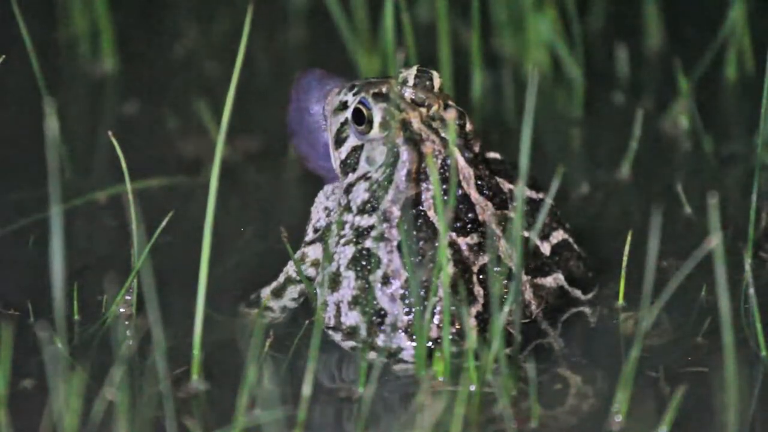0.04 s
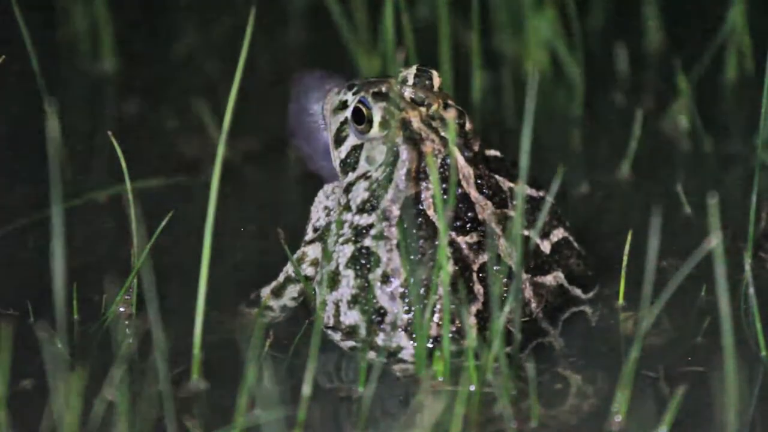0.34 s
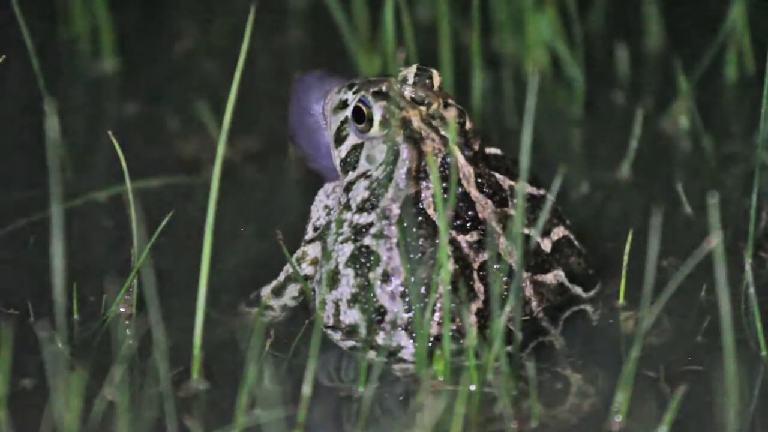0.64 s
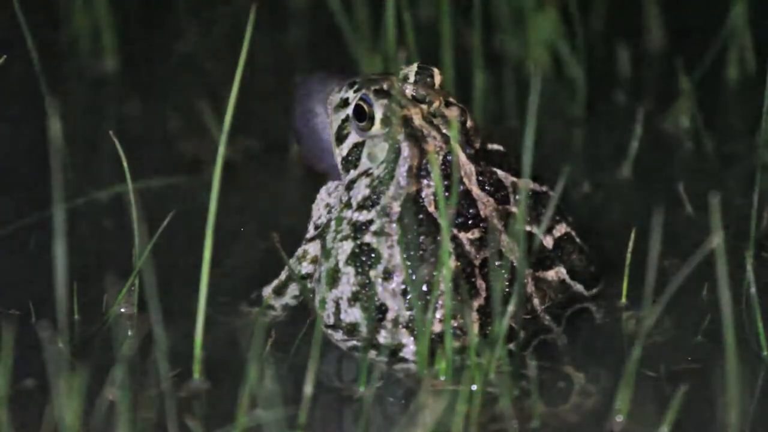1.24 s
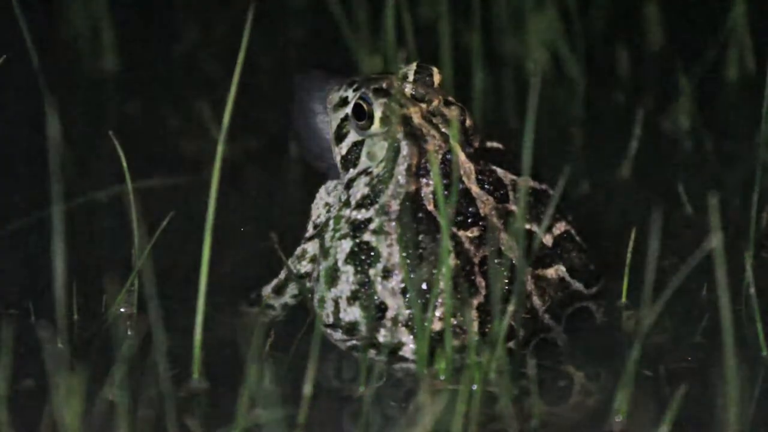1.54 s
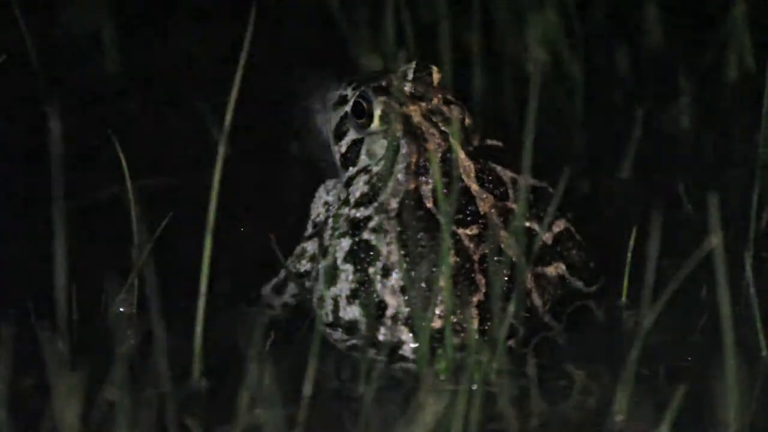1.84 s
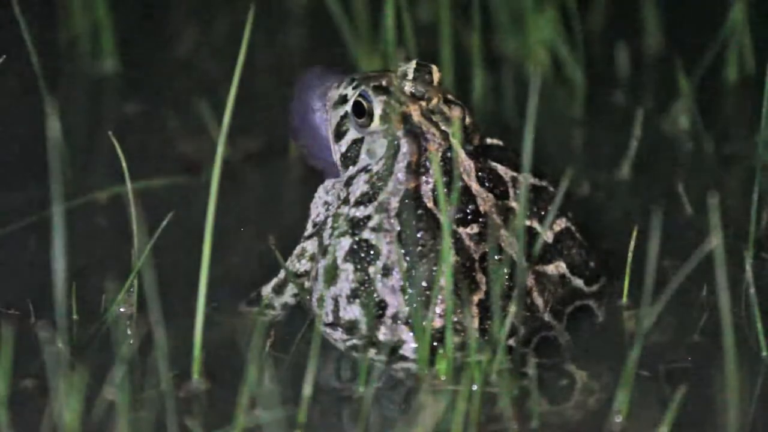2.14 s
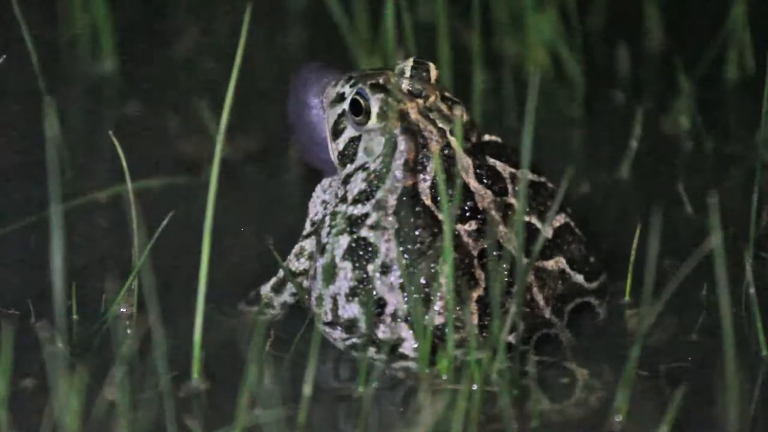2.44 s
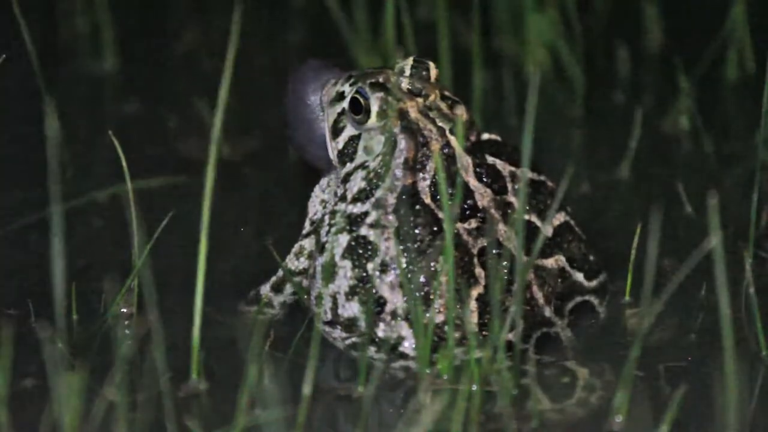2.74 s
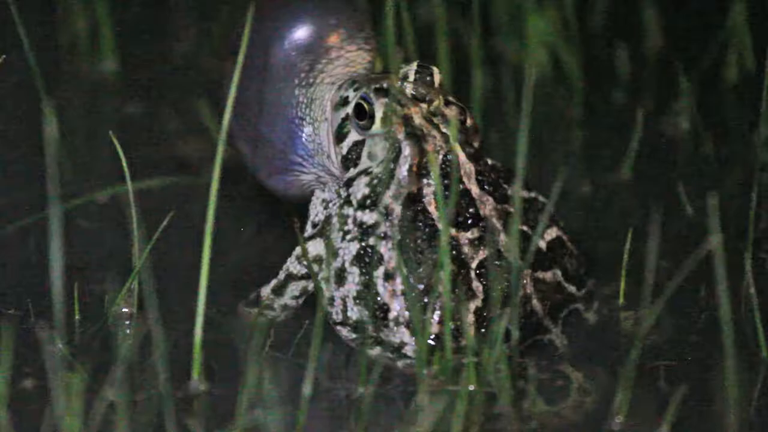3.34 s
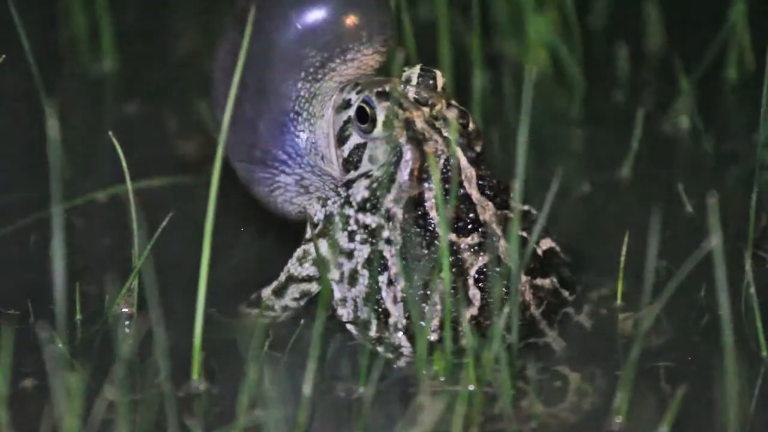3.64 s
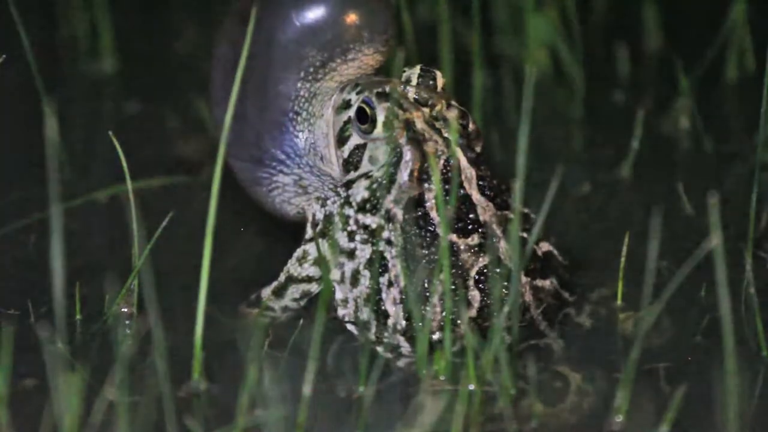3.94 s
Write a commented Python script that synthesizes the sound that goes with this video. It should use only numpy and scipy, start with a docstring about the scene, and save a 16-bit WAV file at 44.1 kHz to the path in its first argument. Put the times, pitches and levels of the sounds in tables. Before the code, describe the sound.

A toad trills rapidly and steadily over a distant chorus, another joining near the end.

```python
"""A toad trills, twelve notes a second, over a chorus in a flooded meadow at night. In each note its vocal
cords give a few short pulses and a longer last one that falls in pitch as the pressure fades.
A toad close by gives creaky chirps and, after three seconds, joins in with full, squeaky notes.
Soft bumps, ticks in the grass and one blip from the water sound over the low rumble of night air,
a faint far-off tone and a thin electrical whine."""
import sys
import numpy as np
from scipy import signal
from scipy.fft import rfft, irfft
from scipy.io import wavfile
from scipy.ndimage import uniform_filter1d, minimum_filter1d

SR = 44100
rng = np.random.default_rng(int(sys.argv[2]) if len(sys.argv) > 2 else 0)


def transcribe(signal):
    """Save signal, clipped to [-1, 1], as a 16-bit WAV file at the path in sys.argv[1]."""
    frames = np.atleast_2d(signal).T
    limited = np.clip(frames, -1, 1)
    pcm = np.round(limited * 32767).astype(np.int16)
    wavfile.write(sys.argv[1], SR, pcm)


N = 176400

# The leader's notes. Each row: start in seconds, relative level in dB, first and last pulse offsets in dB.
LEADER_TRILL = [(0.0058, -5.5, 1.7, 1), (0.088, -6, 0.5, -1), (0.1697, -6, 0.5, 0), (0.2513, -6, 2.6, 0),
                (0.3338, -6, 2, -0.5), (0.4154, -5.5, -0.8, 0), (0.4975, -4.5, -0.5, -2.5),
                (0.5809, -5, -4, -2.5), (0.6632, -5.5, -2, -1), (0.7502, -5.5, -1.4, -3),
                (0.8387, -5, -0.5, -2), (0.9189, -6.5, -1.5, -2), (1.0008, -5.5, -0.9, -3),
                (1.0837, -6, -2.5, -2), (1.1636, -6, -1.0, -1.5), (1.2445, -6, -3.8, -2),
                (1.3261, -6, 0, -1.5), (1.4076, -5, -0.5, -3.5), (1.4896, -5, -1, -1.5),
                (1.5758, -4.5, -0.2, -2.5), (1.6593, -5.5, -6, -1), (1.7441, -6.5, 0.5, -2),
                (1.8253, -6.5, 0.2, -3), (1.906, -7, 2, -1), (1.9902, -5.5, -4.5, 0),
                (2.0747, -5, -0.5, -1), (2.1568, -5.5, 0.1, -2), (2.237, -5, -0.5, -4),
                (2.3186, -5.5, -2.5, -3), (2.4001, -5.5, 0.5, -6), (2.4826, -5.5, -1, -0.5),
                (2.5667, -6, -0.5, -1.5), (2.6469, -6.5, -0.9, -1), (2.7292, -6, -0.5, -2.5),
                (2.8104, -6, 1, -2), (2.892, -6, 0.8, -4.5), (2.9755, -6, 0.5, -1.5),
                (3.0575, -6.5, -0.5, -1), (3.1419, -6.5, 0, -1), (3.2253, -5.5, -2, -2.5),
                (3.3071, -6, 0.5, -1.5), (3.3879, -11, 7, -1), (3.4456, -5.5, -0.6, -3),
                (3.5262, -5, 0.5, -2.5), (3.6092, -5, 0.5, -3), (3.6901, -6, 3, -1.5),
                (3.7721, -6.5, 2, -1), (3.8537, -6.5, -0.5, -4), (3.9356, -6.5, -0.5, -2.5)]
# Overtone envelope of a trill. Each row: frequency in Hz, level in dB against the fundamental.
TRILL_OVERTONES = [(3400, -11), (4200, -38), (4800, -30), (5500, -44), (6300, -64.5), (6900, -47),
                   (7500, -55), (9500, -54.5), (12000, -49), (15000, -62.5)]
# Swell of the distant chorus. Each row: time in seconds, gain in dB.
CHORUS_GAIN = [(0, 0), (.55, -0.5), (.73, -5.5), (.82, 0.5), (1, 3.5), (1.4, 0), (1.6, -1), (1.9, 1.5),
               (2.15, -2.5), (2.5, 0.5), (3, 0.5), (3.25, 0.5), (4, 4.5)]
# Spectrum of the night air. Each row: frequency in Hz, relative level in dB.
AIR_SPECTRUM = [(20, -16.5), (60, 0.5), (115, 4.5), (200, -7.5), (400, -9.5), (620, -4), (1200, -33.5),
                (3500, -22), (6000, -26), (11000, -23), (16000, -36)]
# The neighbours' notes. Each row: start in seconds, level in dB.
NEIGHBOUR_NOTES = [(.064, -14.5), (.143, -14), (0.223, -19), (.302, -22), (0.386, -17), (0.461, -27),
                   (0.534, -17), (.608, -15.5), (0.681, -15), (.762, -18), (.86, -24.5), (0.903, -18.5),
                   (0.979, -19), (1.056, -15), (1.135, -17.5), (1.21, -21), (1.285, -20.5), (1.364, -19.5),
                   (1.44, -17), (1.5, -24), (1.59, -25), (1.655, -26), (1.723, -19), (1.795, -19),
                   (1.874, -19.5), (1.95, -19.5), (2.024, -19), (2.1, -25), (2.179, -23.5), (2.254, -19),
                   (2.369, -23), (2.455, -24.5), (2.54, -19.5), (2.618, -18.5), (2.7, -21.5), (2.776, -23),
                   (2.853, -22.5), (2.932, -18), (3.01, -23.5), (3.087, -23), (3.16, -23), (3.24, -24),
                   (3.551, -20.5), (3.725, -36), (3.812, -20), (3.893, -18), (3.974, -12)]
# Ticks and rustles in the grass. Each row: start in seconds, level in dB, decay time in seconds.
GRASS_TICKS = [(1.133, -45.5, 0.024), (1.665, -46.5, 0.033), (1.769, -35, 0.004), (3.3865, -17, 0.00065)]
# Spectrum of a tick. Each row: frequency in Hz, relative level in dB.
TICK_SPECTRUM = [(300, 4), (3000, 9.5), (6000, -3.5), (11000, -1), (16000, -8)]
# The close toad's warm-up chirps. Each row: time in seconds, level in dB.
WARM_UP_CHIRPS = [(1.14, -20), (1.182, -28), (1.222, -21), (1.265, -21.5), (1.308, -19.5), (1.354, -18),
                  (1.397, -18), (1.439, -19), (1.482, -22), (2.781, -24.5), (2.82, -23.5), (2.86, -21.5),
                  (2.903, -20.5), (2.946, -17.5), (2.991, -17), (3.036, -17.5), (3.082, -18), (3.124, -17),
                  (3.167, -18.5)]
# Overtone envelope of a chirp. Each row: frequency in Hz, level in dB against the fundamental.
CREAK_OVERTONES = [(4200, -23), (5500, -31), (7000, -41.5), (9800, -46.5), (11000, -34.5), (12500, -29.5),
                   (15000, -47)]
# Soft bumps. Each row: start in seconds, level in dB, decay time in seconds.
SOFT_BUMPS = [(2.183, -24.5, 0.016), (2.352, -35, 0.018), (2.757, -41.5, 0.019), (2.84, -48, 0.027),
              (2.92, -46, 0.066), (2.988, -31.5, 0.017), (3.055, -28.5, 0.0082), (3.375, -41.5, 0.016),
              (3.962, -40, 0.042)]
# Spectrum of a bump. Each row: frequency in Hz, relative level in dB.
BUMP_SPECTRUM = [(30, -17.5), (70, -4.5), (110, 2.5), (160, -4), (210, 0), (320, -11), (600, -21.5),
                 (1200, -42.5), (4000, -67.5)]
# The close toad's notes. Each row: start in seconds, pulse count, spacing in seconds, pitch in Hz,
# level in dB, last pulse pitch in Hz, last pulse offset in dB, brightness in dB.
CLOSE_TRILL = [(3.1470, 4, 0.0077, 2560, -16.5, 1890, -10, -2),
               (3.219, 6, 0.009, 2556, -9.5, 2390, -0.5, -1.5),
               (3.318, 6, 0.0083, 2650, -10.5, 1806, -2.5, -0.5),
               (3.3865, 6, 0.0086, 2605, -9.5, 1800, -5, 0.5),
               (3.4822, 5, 0.0082, 2520, -8.5, 1763, -6.5, 0.5),
               (3.57, 4, 0.0084, 2476, -8, 1788, -6.5, -1), (3.6565, 4, .009, 2455, -8.5, 1760, -10, -1.5),
               (3.7435, 4, 0.0091, 2484, -8, 1710, -12.5, -1.5),
               (3.83, 4, .0086, 2466, -8.5, 1772, -8.5, -2),
               (3.9155, 4, 0.0083, 2500, -9.5, 1740, -8.5, -0.5)]
# Overtone envelope of those notes. Each row: frequency in Hz, relative level in dB.
SQUEAK_OVERTONES = [(3500, -45), (4700, -33.5), (5500, -28), (6200, -58), (7500, -47), (8300, -32.5),
                    (9000, -35.5), (10300, -35.5), (11500, -31.5), (12500, -46), (14300, -39), (15500, -50)]
# Resonances of the close toad's throat. Each row: centre in Hz, width in Hz, relative level in dB.
THROAT_RESONANCES = [(884, 780, 5), (1500, 260, 6.5), (5520, 420, -13), (7650, 250, -7.5), (8840, 300, -7),
                     (9440, 160, -4), (10190, 200, 2), (11380, 220, -4), (13200, 260, -7), (14200, 260, -8)]

PULSE_GAP_S, PULSE_S, PULSE_GROWTH = .00834, .0043, .075
LEAD_HZ, ARCH_HZ, BEND_HZ, LEAD_GAIN_DB = 2422, 116, 65.5, -1.5
TAIL_GAP_S, TAIL_S, TAIL_ATTACK_S, TAIL_DECAY_S = .0041, .014, .0011, .0057
CHIRP_HZ, CHIRP_FALL_HZ, CHIRP_S = 2807, 130, .011
CLOSE_PULSE_S, CLOSE_BEND_HZ, CLOSE_TAIL_S, CLOSE_SAG_HZ = .0048, 60, .015, 70.6
TOP_HZ = 16000


def undb(db):
    """Amplitude grows tenfold with every 20 dB."""
    return 10 ** (np.asarray(db) / 20)


def gain_at(hz, spectrum):
    """A spectral envelope, interpolated in dB over log frequency."""
    freqs, db = np.array(spectrum).T
    return undb(np.interp(np.log(hz + 1), np.log(freqs), db))


def noise(spectrum):
    """Spectral shaping turns white noise into coloured noise of unit rms."""
    gain = gain_at(np.arange(N // 2 + 1) * SR / N, spectrum)
    coloured = irfft(rfft(rng.standard_normal(N)) * gain, N)
    return coloured / coloured.std()


def add(out, start, sound):
    """Superposition: a sound adds to the mix from its start in seconds."""
    i = int(round(start * SR))
    a, b = max(i, 0), min(i + len(sound), N)
    if b > a:
        out[a:b] += sound[a - i:b - i]


def ramp(seconds):
    """Normalised time, from 0 to 1."""
    return np.linspace(0, 1, max(int(seconds * SR), 8))


def resonate(x, hz, width_hz):
    """A second-order resonance with unit gain at its centre."""
    return signal.lfilter(*signal.iirpeak(hz, hz / width_hz, fs=SR), x)


def pulse_envelope(u, edge=1.667, fullness=1.243, skew=.8):
    """Soft saturation rounds the top of a pulse that opens faster than it closes."""
    return np.tanh(fullness * np.abs(np.sin(np.pi * u ** skew)) ** edge) / np.tanh(fullness)


def vocal_cords(hz, env, overtones, bright_db=0, step=1):
    """Periodic vibration gives a fundamental and weak harmonics; step=.5 adds lines between them."""
    phase = 2 * np.pi * np.cumsum(hz) / SR
    k = np.arange(1 + step, 9, step)[:, None]
    gains = gain_at(k * hz, overtones) * (k * hz < TOP_HZ)
    upper = gains * np.sin(k * phase + rng.uniform(0, 2 * np.pi, k.shape))
    return env * (np.sin(phase + rng.uniform(0, 2 * np.pi)) + undb(bright_db) * upper.sum(0))


def add_note(out, start, hz, db, first_db, last_db, count=4):
    """Frequency modulation: pulses on an arch of pitch, then a tail that falls as the pressure fades."""
    for k, place in enumerate(np.linspace(-1, 1, count)):
        length = PULSE_S * (1 + PULSE_GROWTH * k)
        u = ramp(length)
        arch_hz = hz - ARCH_HZ * place ** 2 + 14 * place
        pitch = arch_hz - BEND_HZ * (2 * u - 1) ** 2 + 10 * rng.standard_normal()
        accent_db = first_db if k == 0 else 1.52 - .56 * place ** 2
        gain = undb(db + accent_db + .36 * rng.standard_normal())
        pulse = vocal_cords(pitch, pulse_envelope(u), TRILL_OVERTONES)
        add(out, start + k * PULSE_GAP_S - length * .46, gain * pulse)
    u = ramp(TAIL_S)
    attack = 1 - np.exp(-(u * TAIL_S / TAIL_ATTACK_S) ** 2)
    decay = np.exp(-(u * TAIL_S / TAIL_DECAY_S) ** .95) * (1 - u ** 8)
    fall = 489 * (1 + .1 * rng.standard_normal()) * u ** .78
    pitch = (2241 - fall) * hz / LEAD_HZ  # the leader's glide, transposed to this toad
    tail = vocal_cords(pitch, attack * decay, TRILL_OVERTONES, bright_db=-.5)
    add(out, start + (count - 1) * PULSE_GAP_S + TAIL_GAP_S, undb(db + last_db + 2.5) * tail)


def lead_toad():
    """Rapid repetition, about twelve notes a second, is heard as one unbroken trill."""
    out = np.zeros(N)
    for start, db, first_db, last_db in LEADER_TRILL:
        add_note(out, start, LEAD_HZ, db + LEAD_GAIN_DB, first_db, last_db)
    return out


def vocal_sac(call, gain_db=-11.5):
    """A cubic nonlinearity yields the third harmonic, which rings a high resonance of the sac."""
    envelope = np.abs(signal.hilbert(call))
    third_harmonic = call ** 3 - .75 * call * envelope ** 2
    return call + undb(gain_db) * resonate(third_harmonic, hz=6850, width_hz=76)


def water_reflection(call, delay_s=.002315, gain_db=-17):
    """Reflection off the water arrives later and weaker than the direct sound."""
    out = np.zeros(N)
    add(out, delay_s, undb(gain_db) * call)
    return out


def meadow(x, wet_db, rise_s=.0029, decay_s=.013):
    """Scattering from grass and banks adds a short diffuse tail."""
    t = np.arange(SR // 2) / SR
    tail = rng.standard_normal(len(t)) * np.exp(-t / decay_s) * (1 - np.exp(-t / rise_s))
    return x + undb(wet_db) * signal.fftconvolve(x, tail / np.linalg.norm(tail))[:N]


def chorus(toads=5, centre_hz=2269, spread_hz=190, gap_s=.076):
    """Incoherent sources: distant toads, each at its own pitch and pace, blend and swell together."""
    out = np.zeros(N)
    for hz in centre_hz + spread_hz * np.linspace(-1, 1, toads):
        gap = gap_s * rng.uniform(.9, 1.1)
        for start in np.arange(-rng.uniform(0, gap), N / SR, gap):
            add_note(out, start, hz, db=-29 + 1.5 * rng.standard_normal(), first_db=-.43, last_db=-5.7)
    swell_db = np.interp(np.arange(N) / SR, *np.array(CHORUS_GAIN).T)
    return meadow(out, wet_db=-2.5) * undb(swell_db)


def night_air(db=-58):
    """Broadband noise weighted to low frequencies is heard as a rumble."""
    return undb(db) * noise(AIR_SPECTRUM)


def electrical_whine(hz=15667, db=-66.5):
    """A pure tone near the upper limit of hearing."""
    return undb(db) * np.sin(2 * np.pi * hz * np.arange(N) / SR)


def neighbours(centre_hz=2378):
    """Unequal rates carry toads a little farther off in and out of step with the leader."""
    out = np.zeros(N)
    for start, db in NEIGHBOUR_NOTES:
        add_note(out, start, centre_hz + 40 * rng.standard_normal(), db, first_db=-11.5, last_db=-3)
    return out


def far_tone(start_s=.2, end_s=1.5, hz=604, db=-61):
    """Slow random modulation makes a faint tone waver in level and pitch as it swells and fades."""
    u = np.clip((np.arange(N) / SR - start_s) / (end_s - start_s), 0, 1)
    waver = noise([(1, 0), (14, 0), (60, -60), (2000, -140)])
    phase = 2 * np.pi * np.cumsum(hz + 5 * waver[::-1]) / SR
    return undb(db) * np.sin(np.pi * u) * (1 + .35 * waver) * np.sin(phase)


def bursts(rows, spectrum, attack_s):
    """Noise transients decay exponentially: sharp, bright ones tick and slow, dark ones bump."""
    env, t = np.zeros(N), np.arange(SR // 2) / SR
    for start, db, decay in rows:
        add(env, start, undb(db) * (1 - np.exp(-t / attack_s)) * np.exp(-t / decay))
    return env * noise(spectrum)


def close_chirps():
    """Partials between the harmonics lend a creak to the close toad's single falling pulses."""
    out, u = np.zeros(N), ramp(CHIRP_S)
    env = 1.83 * np.tanh((7 * u) ** 2) * np.exp(-2.4 * u) * (1 - u ** 4)
    pitch = CHIRP_HZ - CHIRP_FALL_HZ * u
    for t, db in WARM_UP_CHIRPS:
        add(out, t - .0022, undb(db) * vocal_cords(pitch, env, CREAK_OVERTONES, step=.5))
    return out


def water_blip(start_s=1.602, hz=780, fall_hz=120, db=-45):
    """A brief downward glide with a fluttering amplitude is heard as a plop from the water."""
    out, u = np.zeros(N), ramp(.045)
    flutter = 1 + .5 * np.interp(u, np.linspace(0, 1, 10), rng.standard_normal(10))
    phase = 2 * np.pi * np.cumsum(hz - fall_hz * u) / SR
    add(out, start_s, undb(db) * flutter * np.hanning(len(u)) * np.sin(phase))
    return out


def close_trill():
    """Amplitude modulation: each short pulse gates voice and air noise; a held tail ends the note."""
    out, airflow = np.zeros(N), np.zeros(N)
    for start, pulses, gap, hz, db, last_hz, last_db, bright_db in CLOSE_TRILL:
        u = ramp(CLOSE_PULSE_S)
        for k, place in enumerate(np.linspace(-1, 1, pulses)):
            t = start + k * gap - CLOSE_PULSE_S / 2
            env = pulse_envelope(u) * undb(db - 2.7 * place ** 2)
            arch_hz = hz - 110 * place ** 2
            pitch = arch_hz - CLOSE_BEND_HZ * (2 * u - 1) ** 2 + 20 * rng.standard_normal()
            add(out, t, vocal_cords(pitch, env, SQUEAK_OVERTONES, bright_db - 3.5, step=.5))
            add(airflow, t, env * undb(bright_db))
        u = ramp(CLOSE_TAIL_S)
        env = np.tanh(9 * u) * np.tanh(4 * (1 - u)) * np.exp(-.45 * u) * undb(db + last_db)
        tail = vocal_cords(last_hz - CLOSE_SAG_HZ * u, env, SQUEAK_OVERTONES, bright_db - 5)
        add(out, start + (pulses - 1) * gap + .004, tail)
    return out + throat_rasp(airflow)


def throat_rasp(airflow, ring_s=.001, gain_db=-36.5):
    """Source and filter: throat resonances shape air noise into a low rattle and narrow squeaks."""
    rasp = np.zeros(N)
    for hz, width, db in THROAT_RESONANCES:
        band = resonate(resonate(rng.standard_normal(N), hz, width), hz, 2 * width)
        rasp += undb(db) * band / band.std()
    pole = np.exp(-1 / (ring_s * SR))
    env = signal.lfilter([1 - pole], [1, -pole], airflow)
    return undb(gain_db) * env * rasp


def scene():
    """The toads, their scattered sound and the noises of the night superpose in one channel."""
    lead = vocal_sac(lead_toad())
    out = meadow(lead, wet_db=-29.5) + water_reflection(lead) + chorus()
    out += meadow(close_chirps() + close_trill(), wet_db=-16)
    out += meadow(neighbours(), wet_db=-19)
    out += night_air() + electrical_whine()
    out += bursts(SOFT_BUMPS, BUMP_SPECTRUM, attack_s=.0044)
    out += bursts(GRASS_TICKS, TICK_SPECTRUM, attack_s=.00014)
    out += water_blip() + far_tone()
    return out[None]


def record(dry):
    """Peak limiting holds down whatever exceeds full scale; a steep low-pass cuts the top."""
    gain = minimum_filter1d(np.minimum(1, 1 / (np.abs(dry) + 1e-9)), size=301)
    smooth_gain = uniform_filter1d(uniform_filter1d(gain, size=151), size=151)
    return signal.sosfilt(signal.ellip(10, .1, 80, TOP_HZ, fs=SR, output="sos"), dry * smooth_gain)


dry = scene()
out = record(dry)
transcribe(out)
```